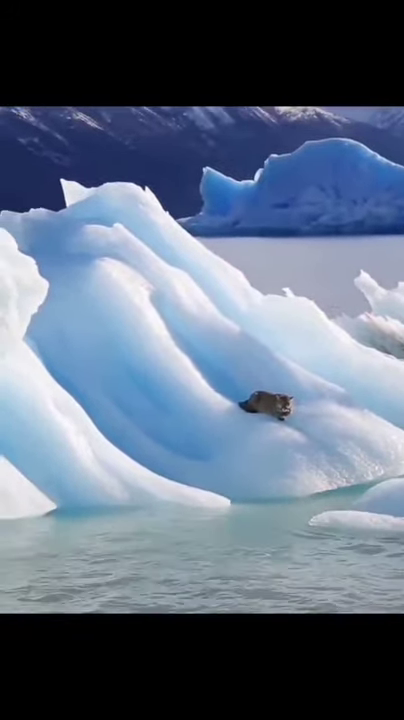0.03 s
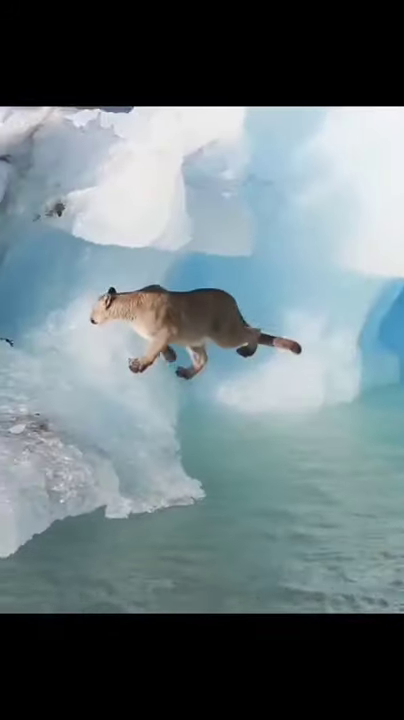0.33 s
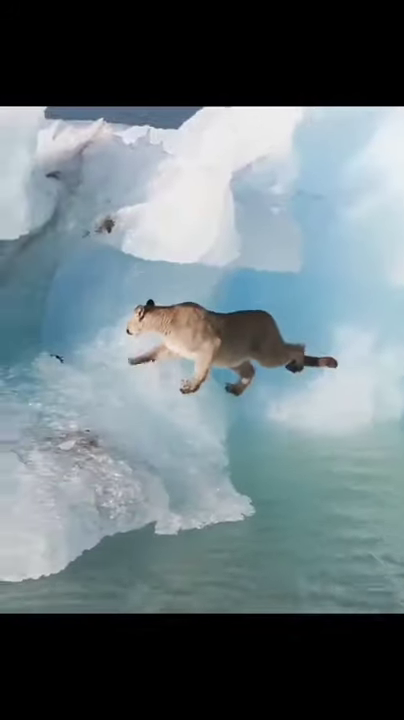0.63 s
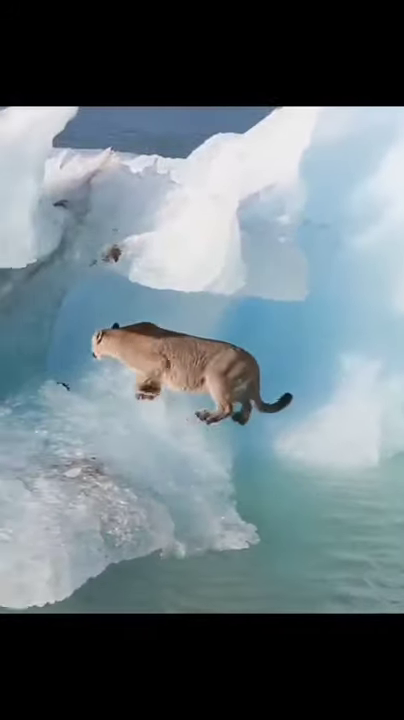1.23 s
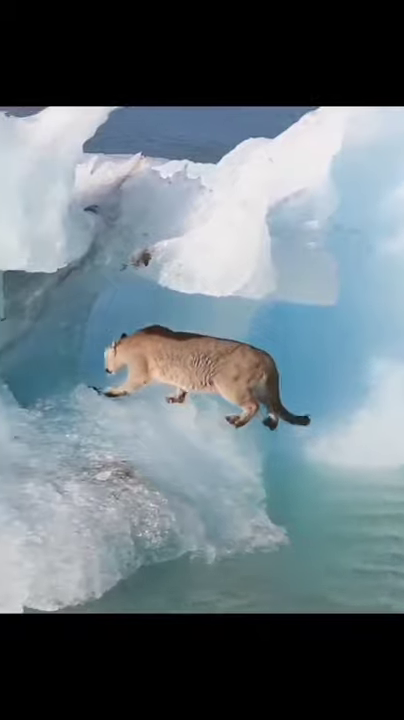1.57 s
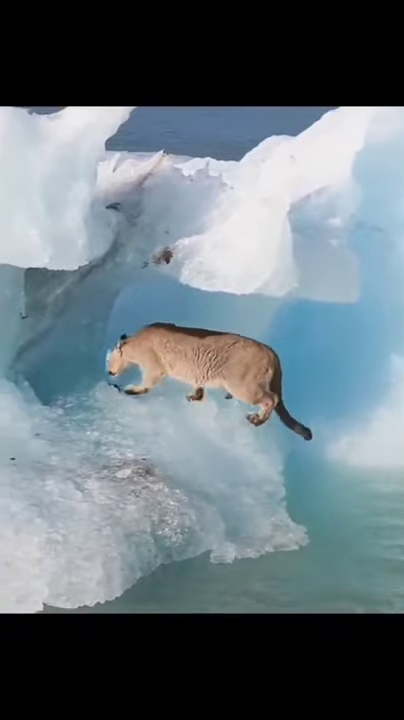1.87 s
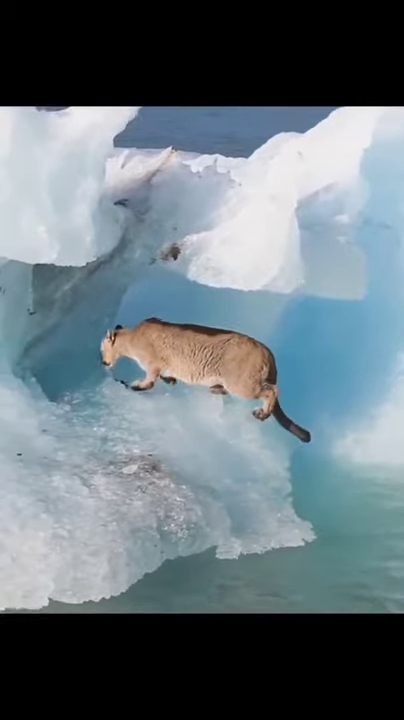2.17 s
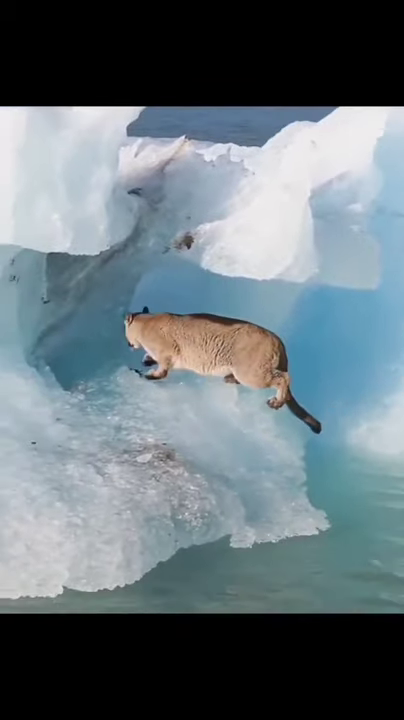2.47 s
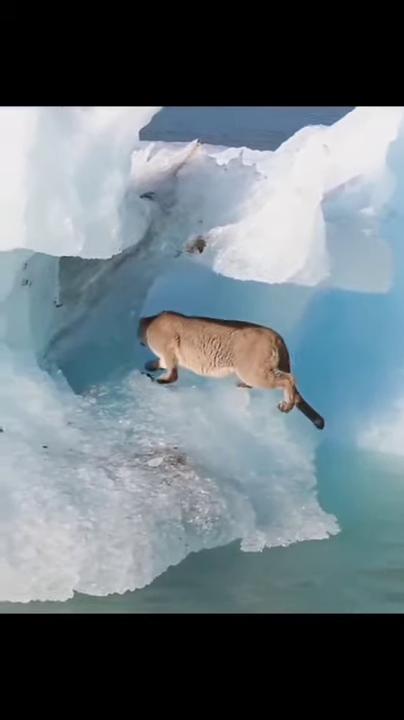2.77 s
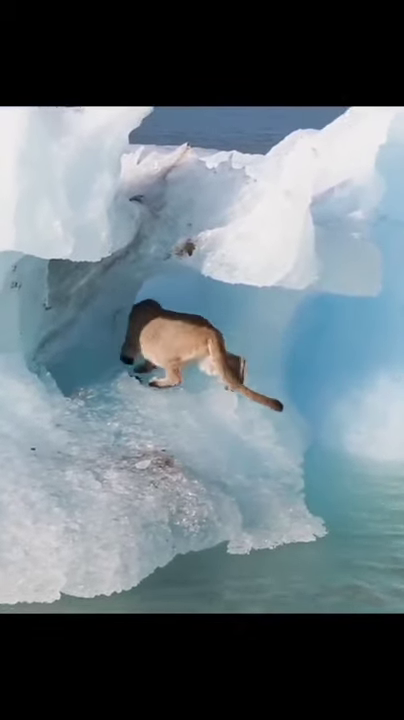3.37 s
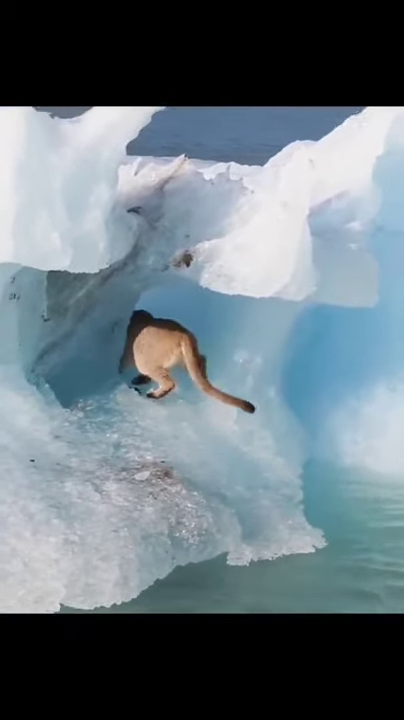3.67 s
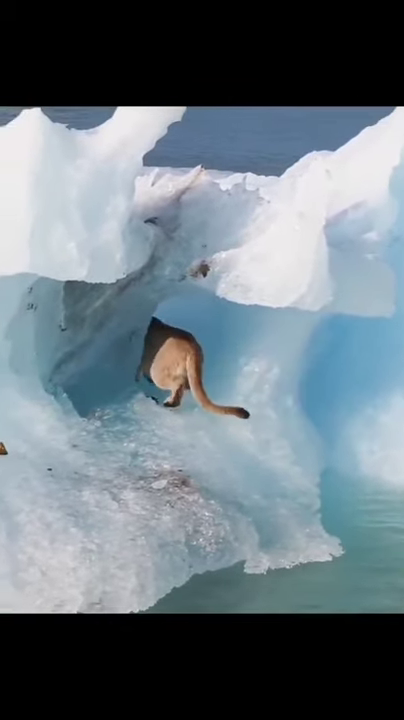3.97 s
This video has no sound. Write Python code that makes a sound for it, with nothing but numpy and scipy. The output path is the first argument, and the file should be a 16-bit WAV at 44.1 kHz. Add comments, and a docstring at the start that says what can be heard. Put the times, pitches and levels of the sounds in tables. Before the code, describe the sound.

Wind rumbles and thumps on the microphone in gusts over quietly lapping water.

```python
"""Low rumbling gusts with a ragged flutter on top buffet a microphone on a boat beside an iceberg.
Turbulent eddies make the rumble as pressure fluctuations; single ones strike as thumps and slaps.
Small waves lap and fizz along the ice, drops and spray tick on impact, and bubbles ring as resonators.
In the lulls the idling engine hums faintly. Near the start the sound cuts out briefly with a click."""
import sys
import numpy as np
from scipy import signal
from scipy.fft import rfft, irfft
from scipy.io import wavfile
from scipy.ndimage import uniform_filter1d

SR = 44100
rng = np.random.default_rng(int(sys.argv[2]) if len(sys.argv) > 2 else 0)


def to_wav(s):
    """Save 16-bit WAV."""
    ch = np.atleast_2d(s).T  # columns
    pcm = np.round(np.clip(ch, -1, 1) * 32767)  # PCM
    wavfile.write(sys.argv[1], SR, pcm.astype(np.int16))


N = 176400

# Spectra of the wind's low, middle and upper bands, and of spray: frequency_hz, relative_density_db
RUMBLE_SPECTRUM = [(25, -33), (60, -12.5), (100, -5), (150, 1), (250, 0), (350, -6.5), (500, -11),
                   (800, -29.5), (1500, -52.5), (4000, -81.5)]
FLUTTER_SPECTRUM = [(100, -25), (250, 5), (450, 1.5), (650, 0), (900, -4.5), (1200, -10), (1600, -19),
                    (2200, -34.5), (3200, -41.5), (6000, -67.5), (14000, -64)]
RASP_SPECTRUM = [(700, -17), (1300, 6), (1900, 2.5), (2500, -6.5), (3200, -19.5), (4500, -39), (9000, -43)]
SPRAY_SPECTRUM = [(1500, -2), (3500, 2.5), (6000, 5), (9000, 1.5), (12000, 5), (14500, -17)]
# Envelope of the water along the ice: time_s, relative_level_db
WATER_LEVELS = [(0, -65), (.08, -62), (.16, -54.5), (.3, -56.5), (.44, -49.5), (.52, -57.5), (.57, -50.5),
                (.69, -57), (.77, -53.5), (.84, -52), (.91, -61), (.97, -54.5), (1.15, -55.5), (1.3, -55.5),
                (1.36, -52), (1.43, -55), (1.55, -50.5), (1.62, -53.5), (1.71, -55.5), (1.78, -55),
                (1.82, -56.5), (1.95, -48.5), (2.04, -55), (2.12, -57.5), (2.16, -50.5), (2.25, -51.5),
                (2.36, -51), (2.55, -55.5), (2.66, -52.5), (2.8, -58), (2.97, -50.5), (3.09, -61.5),
                (3.15, -52.5), (3.27, -57.5), (3.45, -55.5), (3.62, -58), (3.7, -58), (3.86, -57.5),
                (3.93, -53.5), (4, -49.5)]


def amp(db):
    """Decibels to amplitude ratio."""
    return 10 ** (np.asarray(db) / 20)


def unit(x):
    """Normalisation to an rms of one."""
    return x / np.sqrt(np.mean(x ** 2) + 1e-20)


def curve(rows, column=1):
    """Linear interpolation of one column of a timed table, at every sample."""
    rows = np.array(rows)
    return np.interp(np.arange(N) / SR, rows[:, 0], rows[:, column])


def add(mix, start_s, sound):
    """Superposition of a sound on the mix from a given time."""
    part = mix[max(round(start_s * SR), 0):][:len(sound)]
    part += sound[:len(part)]


def pulse(t, db, rise_s, decay_s):
    """Envelope of a damped transient: linear rise, exponential decay."""
    return amp(db) * np.minimum(t / rise_s, 1) * np.exp(-t / decay_s)


def colour(x, spectrum):
    """Minimum-phase filtering by a spectrum; the result has an rms of one."""
    hz, db = np.transpose(spectrum)
    log_hz = np.log(abs(np.fft.fftfreq(N, 1 / SR)) + 1)
    log_gain = np.log(amp(np.interp(log_hz, np.log(hz), db)))
    response = np.exp(np.conj(signal.hilbert(log_gain)))
    return unit(irfft(rfft(x) * response[:N // 2 + 1], N))


def noise():
    """Gaussian white noise."""
    return rng.standard_normal(N)


def wander(low_hz, high_hz):
    """Random drift: noise band-passed between two rates."""
    hz = np.fft.rfftfreq(N, 1 / SR)
    return unit(irfft(rfft(noise()) * hz / (hz + low_hz) / (1 + (hz / high_hz) ** 2), N))


def impacts(per_s, spread_db):
    """Shot noise: independent clicks of random sign and size."""
    size = amp(spread_db * np.minimum(rng.exponential(1, N), 4))
    return unit(size * rng.choice([-1, 1], N) * (rng.random(N) < per_s / SR))


def steadied(x, samples):
    """Division by the running rms removes chance swells, so that an envelope can set the level."""
    return x / np.sqrt(uniform_filter1d(uniform_filter1d(x ** 2, samples), samples // 2) + 1e-9)


def wind():
    """Turbulent pressure on the microphone: a thud, a rumble and a flutter that rasps in strong gusts."""
    # Gust envelopes: time_s, relative_rumble_db, relative_flutter_db
    gusts = [(0.0, -33.5, -57), (0.048, -29, -69), (0.086, -17, -35), (0.096, -21.5, -49),
             (0.118, -36, -62), (0.132, -24, -45), (0.17, -36.5, -56), (0.3, -22, -31.5),
             (0.325, -28.5, -43), (0.34, -22, -35.5), (0.38, -12.5, -28), (0.4, -23, -40), (0.43, -7, -25),
             (0.47, -21.5, -28), (0.54, -20, -30.5), (0.61, -17.5, -34), (0.625, -29, -50),
             (0.645, -20, -31.5), (0.7, -16.5, -37), (0.725, -14, -22.5), (0.77, -27.5, -42),
             (0.825, -15, -30), (0.855, -20, -37.5), (0.91, -21, -43), (0.945, -17, -32.5),
             (0.975, -31.5, -38), (1.01, -15, -50), (1.035, -23.5, -36), (1.07, -20, -26),
             (1.145, -21.5, -24), (1.188, -24.5, -37), (1.205, -43, -45.5), (1.31, -33, -47),
             (1.345, -25.5, -28.5), (1.368, -20, -36.5), (1.398, -27, -35), (1.425, -24, -43),
             (1.445, -22.5, -38.5), (1.48, -17.5, -25), (1.518, -22, -28.5), (1.535, -26, -39),
             (1.6, -35.5, -48), (1.67, -35.5, -37.5), (1.69, -24, -47), (1.72, -23.5, -36),
             (1.82, -32, -44.5), (1.895, -33.5, -45), (1.915, -23, -30.5), (1.95, -27.5, -46),
             (2.0, -28.5, -34.5), (2.035, -34, -36), (2.09, -25.5, -37), (2.14, -29.5, -34),
             (2.2, -20.5, -32.5), (2.24, -26.5, -34), (2.28, -26.5, -32.5), (2.38, -23, -23),
             (2.48, -24, -25), (2.493, -33, -29.5), (2.518, -19.5, -35), (2.535, -29.5, -50),
             (2.58, -32, -37), (2.59, -34, -28.5), (2.615, -15, -27), (2.73, -22.5, -32), (2.752, -32, -41),
             (2.808, -40, -49), (2.82, -17, -25.5), (2.85, -16.5, -24.5), (2.92, -22, -26.5),
             (2.94, -28, -41), (2.965, -27.5, -35), (3.03, -22, -30), (3.06, -28.5, -40),
             (3.115, -33.5, -39), (3.15, -22, -38.5), (3.2, -29.5, -34.5), (3.235, -19.5, -27),
             (3.28, -26.5, -32), (3.305, -22.5, -28), (3.33, -21.5, -28), (3.38, -12, -30),
             (3.42, -23, -24.5), (3.45, -16.5, -25), (3.495, -26.5, -28.5), (3.526, -25, -34),
             (3.536, -24, -23), (3.61, -12.5, -23), (3.65, -19.5, -23.5), (3.76, -18, -21),
             (3.8, -18, -21.5), (3.85, -18.5, -31), (3.89, -31, -35.5), (3.93, -17, -28),
             (3.95, -34, -32.5), (4.0, -19.5, -23.5)]
    # Deepest band of the wind: frequency_hz, relative_density_db
    thud_spectrum = [(15, -27), (30, -17), (50, -8), (80, 3.5), (115, 5), (170, -22.5), (400, -54)]
    impact_share, steady_flow_db, rasp_reference_db = 0.64, -17, -22
    rumble_db, flutter_db = curve(gusts, column=1), curve(gusts, column=2)
    rasp_db = -38 + 2 * (flutter_db - rasp_reference_db)  # grows twice as fast as the flutter
    eddies = [np.sqrt(impact_share) * impacts(per_s=900, spread_db=2.5)
              + np.sqrt(1 - impact_share) * noise() for _ in range(3)]
    churn = wander(low_hz=3.5, high_hz=89)
    churn /= 1 + amp(flutter_db - steady_flow_db) ** 2  # the strongest flow is the most even
    thud = steadied(colour(noise(), thud_spectrum), samples=4000)
    rumble = steadied(colour(eddies[0] * amp(2.15 * churn), RUMBLE_SPECTRUM), samples=1300)
    flutter = steadied(colour(eddies[1] * amp(2.66 * churn), FLUTTER_SPECTRUM), samples=1300)
    rasp = steadied(colour(eddies[2] * amp(11.0 * churn), RASP_SPECTRUM), samples=2600)
    return (thud * amp(-26 + 0.32 * rumble_db) + rumble * amp(rumble_db)
            + flutter * amp(flutter_db + 3) + rasp * amp(rasp_db))


def lapping():
    """Small waves modulate a broadband wash and the shot noise of drops: dense fizz, sparse crackle."""
    # Spectra of the waves and of the drops: frequency_hz, relative_density_db
    wash_spectrum = [(100, 29), (400, 20.5), (800, 15), (1500, 21), (2500, 12.5), (3700, 7.5), (5000, 2),
                     (7000, -1), (10500, 0), (13000, -11.5), (14500, -4)]
    drop_spectrum = [(800, -7), (2500, 13.5), (4500, 0.5), (7000, -0.5), (11000, -3), (14500, -5.5)]
    envelope = amp(curve(WATER_LEVELS) + 2.1 * wander(low_hz=2, high_hz=40))
    wash = amp(7) * colour(noise(), wash_spectrum)
    fizz = amp(-3) * colour(impacts(per_s=830, spread_db=2.5), drop_spectrum)
    crackle = amp(-10) * colour(impacts(per_s=200, spread_db=-7.5), drop_spectrum)
    return envelope * (wash + fizz + crackle)


def engine():
    """Periodic vibration of the idling engine gives a line spectrum of faint, slightly drifting tones."""
    # Partials of the hum: pitch_hz, rms_level_db
    partials = [(113, -40), (205, -49.5), (270, -43.5), (526, -53), (742, -62.5), (1084, -59),
                (1174, -57.5)]
    hum = np.zeros(N)
    for hz, db in partials:
        cycles = np.cumsum(hz * (1 + 0.002 * wander(low_hz=1, high_hz=7.8))) / SR
        amplitude = np.sqrt(2) * amp(db + 0.8 * wander(low_hz=0.77, high_hz=6.2))
        hum += amplitude * np.sin(2 * np.pi * cycles)
    return hum


def bubble(hz, db, decay_s):
    """A bubble is a damped oscillator; its rough ring rises in pitch as it dies."""
    roughness, glide_per_s = 0.45, 6.7
    t = np.arange(SR // 20) / SR
    wobble = 1 + roughness * unit(uniform_filter1d(rng.standard_normal(len(t)), size=50))
    ring = np.sin(2 * np.pi * hz * (t + glide_per_s * t ** 2 / 2))
    return pulse(t, db, rise_s=0.00095, decay_s=decay_s) * wobble * ring


def bubbles(small_count=260):
    """Bubble resonance: a few clear plinks among many small ones whose level follows the lapping."""
    # Clearly ringing bubbles: start_s, pitch_hz, level_db, decay_s
    plinks = [(.581, 2240, -35, 0.0049), (0.712, 2650, -39, 0.0091), (0.745, 2930, -38, .004),
              (.848, 1770, -30.5, 0.005), (.944, 4400, -48, 0.0054), (1.44, 2950, -41, 0.0033),
              (1.486, 4500, -48, .004), (1.774, 3800, -44, .005), (1.792, 3680, -43, .004),
              (1.955, 4400, -42, .004), (2.098, 6350, -35.5, 0.0019), (3.912, 2690, -39, .008)]
    low_hz, high_hz, decay_cycles = 1280, 5050, 9.4
    rings, water_db = np.zeros(N), curve(WATER_LEVELS)
    for start_s, hz, db, decay_s in plinks:
        add(rings, start_s, bubble(hz, db, decay_s))
    for when, pitch, strength in rng.random((small_count, 3)):
        onset = int(when * N)
        hz = low_hz * (high_hz / low_hz) ** pitch
        db = water_db[onset] + 3.5 + 9 * strength ** 2
        add(rings, onset / SR, bubble(hz, db, decay_cycles / hz))
    return rings


def buffets():
    """Pressure transients of single eddies: soft ones thump, hard ones slap with a jolt and a rasp."""
    # Eddies striking the microphone: start_s, level_db, decay_s, hardness (0 to 1)
    strikes = [(.128, -29.5, 0.0058, 0.97), (0.339, -24, .009, .9), (0.507, -18.5, 0.0069, 0.7),
               (0.599, -32, 0.0055, .8), (0.713, -24, 0.0089, 1), (0.828, -7, 0.0043, 0.03),
               (0.872, -13, 0.011, 0.02), (1.035, -31, 0.0087, 0.6), (1.326, -25.5, 0.0093, 0.6),
               (1.409, -21.5, 0.0048, 0.9), (1.428, -23, 0.0028, 1), (1.475, -18.5, 0.0068, 0.5),
               (1.559, -14, 0.0062, 0), (1.791, -17, 0.0019, 0.87), (1.904, -25.5, 0.0041, 0.96),
               (1.965, -15.5, 0.0038, 0), (2.064, -30, 0.0097, 1), (2.189, -22.5, 0.012, 0.8),
               (2.439, -24, 0.006, 1), (2.584, -18, .013, 0.66), (2.641, -29, 0.0051, 0.9),
               (2.815, -28, 0.014, 0.8), (2.838, -16.5, 0.0049, 0.45), (2.857, -14, .006, 0.3),
               (3.015, -28, 0.012, 0.7), (3.213, -21.5, 0.0084, 0.9), (3.229, -19.5, .011, 0.95),
               (3.411, -15.5, 0.0061, 1), (3.53, -15.5, 0.012, 1), (3.964, -34, .008, 1)]
    rise_s, jolt_hz = 0.00156, 380
    soft, hard, fronts = np.zeros((3, N))
    t = np.arange(SR // 8) / SR
    phase = 2 * np.pi * jolt_hz * (t - rise_s)
    jolt = (1 - 2 * phase ** 2) * np.exp(-phase ** 2)  # the pressure front of a hard buffet
    for start_s, db, decay_s, hardness in strikes:
        blow = pulse(t, db, rise_s, decay_s)
        add(soft, start_s, np.sqrt(1 - hardness) * blow)
        add(hard, start_s, np.sqrt(hardness) * blow)
        add(fronts, start_s, hardness * amp(db + 1) * jolt)
    slap = steadied(colour(noise(), FLUTTER_SPECTRUM), samples=200)
    rasp = amp(-18.5) * colour(noise(), RASP_SPECTRUM)
    thump = steadied(colour(noise(), RUMBLE_SPECTRUM), samples=400)
    return soft * thump + hard * (slap + rasp) + fronts


def wavelet_slaps():
    """Each wavelet meets the ice as a quick swell of dense shot noise, heard as a grainy splash."""
    # Wavelets slapping the ice: start_s, length_s, level_db
    wavelets = [(0.136, 0.024, -51.5), (0.542, 0.1, -53), (0.935, 0.03, -59), (1.76, 0.031, -52),
                (1.838, 0.021, -45), (2.174, 0.077, -52.5), (2.229, 0.046, -44.5), (2.282, 0.042, -43),
                (2.94, 0.05, -49.5), (3.108, 0.039, -48)]
    # Spectrum of the splash: frequency_hz, relative_density_db
    splash_spectrum = [(400, -27), (1200, 1.5), (2700, 8), (3800, 4.5), (5500, -9), (9000, -10),
                       (14000, -29)]
    swell = np.zeros(N)
    for start_s, length_s, db in wavelets:
        progress = np.linspace(0, 1, int(length_s * SR))
        add(swell, start_s, amp(db) * np.sin(np.pi * progress ** 0.73))
    return swell * colour(impacts(per_s=3700, spread_db=2.5), splash_spectrum)


def sharp_ticks():
    """Short impulses have wide spectra: a click as the sound cuts out, then single drops snapping."""
    # Sharp ticks: start_s, level_db
    ticks = [(0.173, -34), (0.7467, -39), (.753, -41), (1.2667, -38), (1.353, -38), (1.357, -41),
             (1.557, -40), (1.673, -44), (1.728, -43), (1.9714, -32), (2.149, -40), (2.202, -40),
             (3.911, -38)]
    snap_decay_s, tail_decay_s, tail_db = 0.00043, 0.003, -23
    snaps, t = np.zeros(N), np.arange(SR // 30) / SR
    envelope = np.exp(-t / snap_decay_s) + amp(tail_db) * np.exp(-t / tail_decay_s)
    for start_s, db in ticks:
        add(snaps, start_s, amp(db) * envelope)
    return snaps * steadied(colour(noise(), SPRAY_SPECTRUM), samples=24)


def spray_spatters():
    """The impacts of landing spray add incoherently into short, bright bursts of noise."""
    # Spray landing: start_s, level_db, decay_s
    landings = [(0.455, -46, 0.019), (0.629, -43.5, 0.011), (.747, -50, 0.0028), (.783, -47.5, 0.022),
                (0.803, -39.5, 0.0066), (1.224, -47, 0.004), (1.545, -51, 0.0026), (1.776, -44, .004),
                (2.632, -47.5, .014), (3.172, -46, .005), (3.681, -48.5, 0.011)]
    bursts, t = np.zeros(N), np.arange(SR // 10) / SR
    for start_s, db, decay_s in landings:
        add(bursts, start_s, pulse(t, db, rise_s=0.00046, decay_s=decay_s))
    return bursts * colour(noise(), SPRAY_SPECTRUM)


def scene():
    """Superposition of wind, water, engine and ticks, in mono."""
    return (wind() + lapping() + engine() + bubbles() + buffets()
            + wavelet_slaps() + sharp_ticks() + spray_spatters())[None]


def record(dry):
    """Soft limiting holds the strongest gusts; a brief dropout and a low-pass filter follow."""
    limit_db, averaging_s, cutoff_hz = -12.5, 0.0028, 14000
    stop_s, resume_s, fade_out_s, fade_in_s = 0.1742, 0.2916, 0.00038, 0.0024
    t = np.arange(N) / SR
    window = np.hanning(int(2 * averaging_s * SR))
    power = signal.oaconvolve(dry[0] ** 2, window / window.sum(), "same")
    overload = power / amp(limit_db) ** 2
    limited = dry / (1 + overload ** 4) ** (1 / 8)
    gate = np.clip(np.maximum((stop_s - t) / fade_out_s, (t - resume_s) / fade_in_s), 0, 1)
    lowpass = signal.firwin(511, cutoff_hz, window=("kaiser", 9), fs=SR)
    return signal.oaconvolve(limited * gate, lowpass[None], "same")


dry = scene()
out = record(dry)
to_wav(out)
```